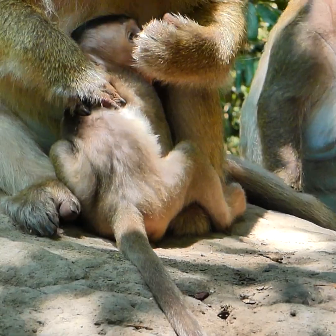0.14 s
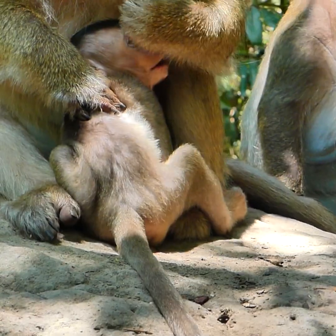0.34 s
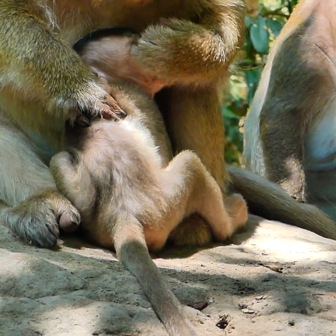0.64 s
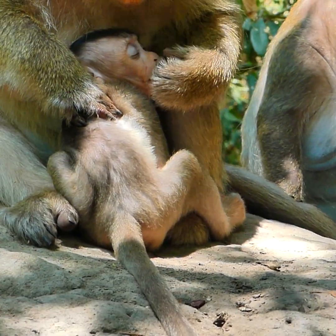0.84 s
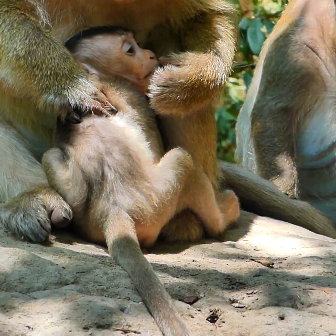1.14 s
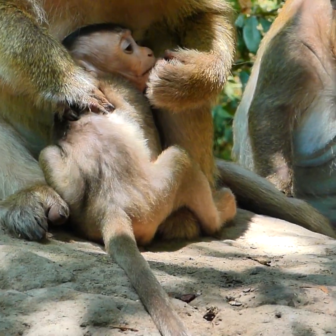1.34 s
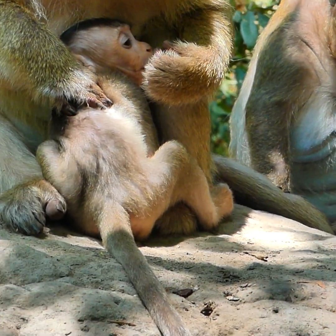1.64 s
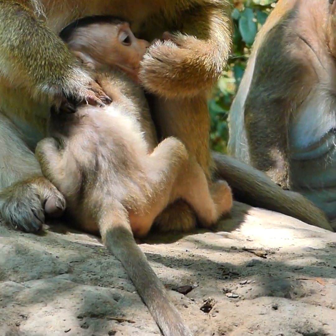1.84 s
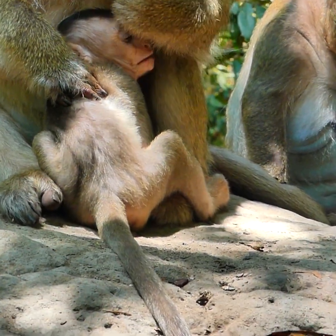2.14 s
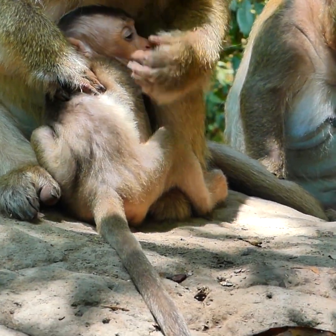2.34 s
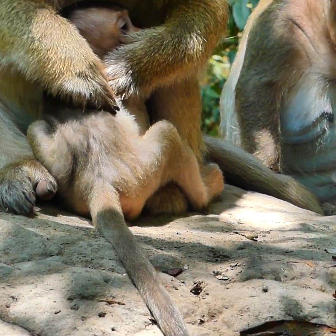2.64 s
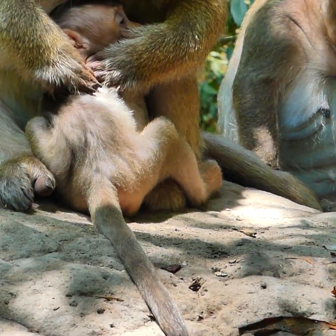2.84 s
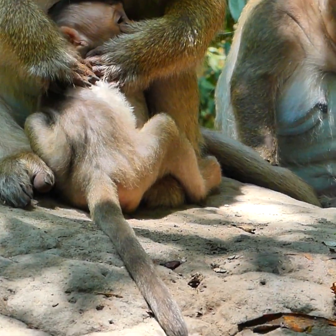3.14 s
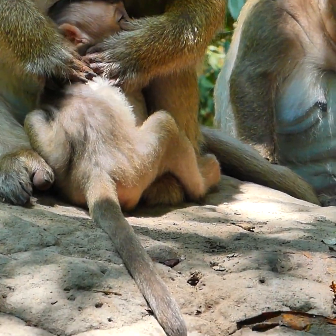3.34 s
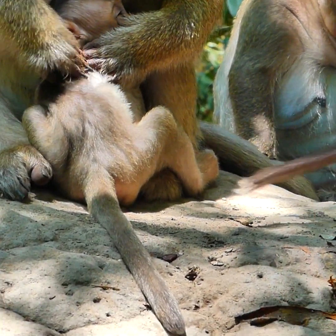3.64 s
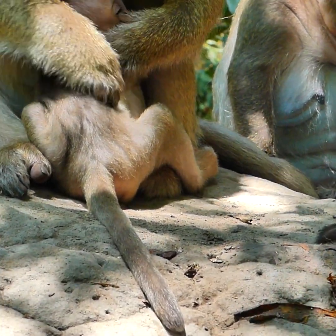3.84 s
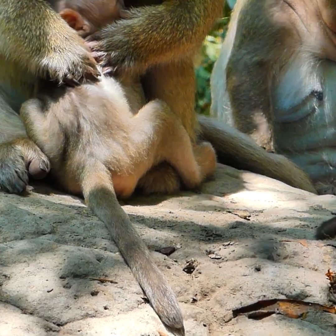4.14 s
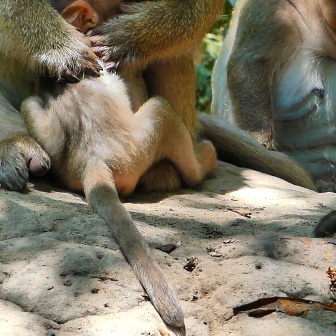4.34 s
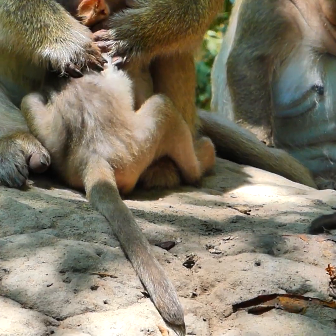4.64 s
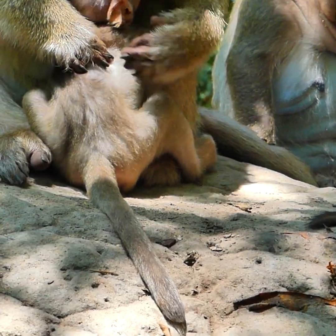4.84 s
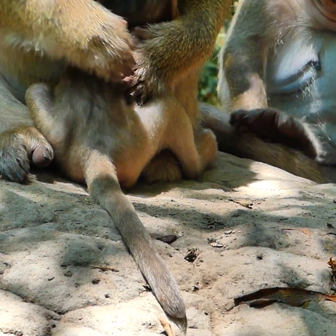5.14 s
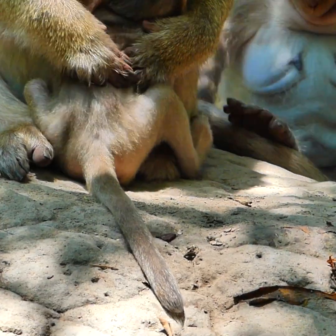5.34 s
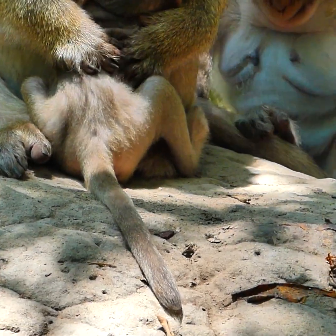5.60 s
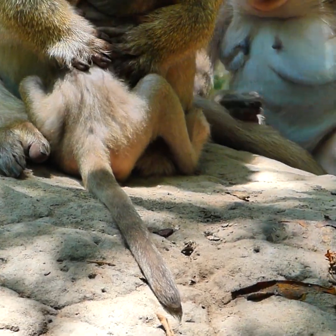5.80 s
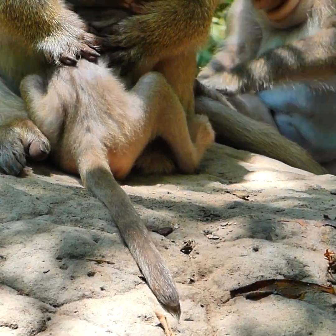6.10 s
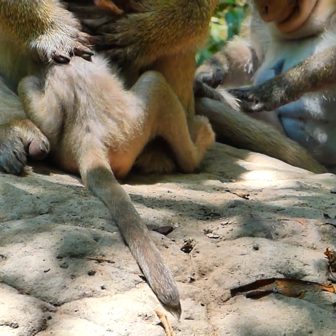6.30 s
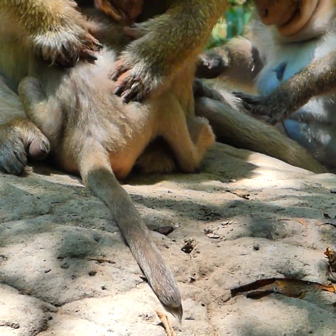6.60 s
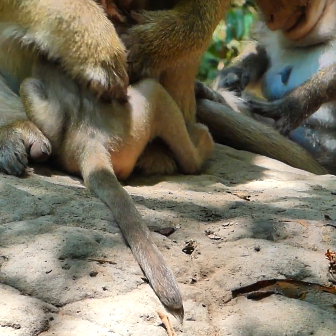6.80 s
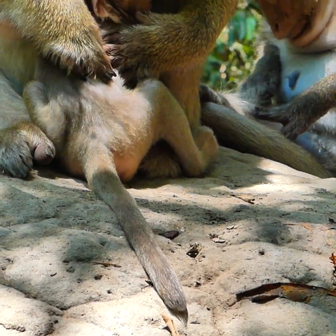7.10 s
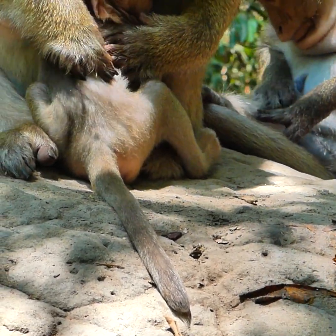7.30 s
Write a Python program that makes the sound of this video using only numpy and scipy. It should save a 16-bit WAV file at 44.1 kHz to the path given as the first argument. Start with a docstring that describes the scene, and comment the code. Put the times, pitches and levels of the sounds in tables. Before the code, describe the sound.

Pulsing cicadas and a chipping bird surround a baby monkey's soft squeaks, hoots and brief rasp, ending in a twig snap, leaf scuffle and piercing cries.

```python
"""Low forest rumble, far insect drones and two swelling, throbbing cicadas lie under a young monkey's
whimpers: near-sine cries with weak partials, soft hoots, and a noise-driven rasp from 0.6 s.
Crackling noise makes the rustles of fur and dry leaves; a bird repeats a quick four-stroke chip in pairs.
The cicadas break off near 5 s; at 6.5 s a twig snaps, leaves scuffle, and the last cries turn shrill.
Rustles, rasp, scuffle and snap reach the right ear later than the left."""
import sys
import numpy as np
from scipy import signal
from scipy.fft import rfft, irfft, next_fast_len
from scipy.io import wavfile
from scipy.ndimage import uniform_filter1d, map_coordinates

SR = 44100
rng = np.random.default_rng(int(sys.argv[2]) if len(sys.argv) > 2 else 0)


def gain_from_db(level_db):
    """Convert decibel levels to linear amplitude factors (20 dB per decade)."""
    decades = np.asarray(level_db, float) / 20
    return 10 ** decades


def transcribe(signal):
    """Save signal, clipped to [-1, 1], as a 16-bit WAV file at the path in sys.argv[1]."""
    frames = np.atleast_2d(signal).T
    limited = np.clip(frames, -1, 1)
    pcm = np.round(limited * 32767).astype(np.int16)
    wavfile.write(sys.argv[1], SR, pcm)


N = 328986


def evened(x):
    """Scales to rms 1."""
    return x / np.sqrt(np.mean(x ** 2) + 1e-20)


def smooth_noise(size, span):
    """White noise averaged over span samples; its rms sinks as span grows."""
    return uniform_filter1d(rng.standard_normal(size), span)


def flicker(size, depth_db, span):
    """A random gain of rms depth_db that wanders over about span samples."""
    return gain_from_db(depth_db * evened(uniform_filter1d(smooth_noise(size, span), span)))


def read(points, hz):
    """Reads a spectrum table on a log-frequency axis."""
    f, value = np.transpose(points)
    return np.interp(np.log(hz + 1), np.log(f + 1), value)


def add(mix, s, sound):
    """Mixes a two-ear sound in at time s."""
    part = mix[:, round(s * SR):][:, :sound.shape[1]]
    part += sound[:, :part.shape[1]]


def resonate(x, hz, width_hz):
    """Two passes of a resonance of gain 1 that follows the curve hz."""
    turn = np.exp(2j * np.pi * np.cumsum(hz * np.ones(x.shape[-1])) / SR)
    r = np.exp(-np.pi * width_hz / SR)
    low = signal.lfilter([(1 - r) ** 2], [1, -2 * r, r * r], x / turn)
    return 2 * (turn * low).real


def coloured(x, shape_db):
    """Filters x by a dB function of frequency."""
    size = next_fast_len(x.shape[-1])
    gain = gain_from_db(shape_db(np.fft.rfftfreq(size, 1 / SR)))
    return irfft(rfft(x, size) * gain, size)[..., :x.shape[-1]]


def two_ears(x, lag_ms, other, same):
    """The right ear hears x late, mixed with a share of unrelated sound."""
    late = map_coordinates(x, [np.arange(len(x)) - lag_ms * SR / 1000], order=3)
    return np.array([x, same * late + np.sqrt(1 - same ** 2) * other])


def crackle(size, grain_db=-1.0, per_s=2500, hiss=0.57):
    """Two unrelated streams of sparse clicks of uneven size in hiss."""
    gauss = rng.standard_normal((2, size))
    struck = rng.random((2, size)) < per_s / SR
    grain = gain_from_db(grain_db * np.minimum(rng.exponential(1, (2, size)), 4))
    return hiss * gauss + evened(gauss * struck * grain)


def echoes(x, t60_s, level_db):
    """Adds the scattered return from trunks and rock, other taps for each ear."""
    t = np.arange(round(.3 * SR)) / SR
    taps = rng.standard_normal((2, len(t))) * (rng.random((2, len(t))) < .05)
    tail = taps * gain_from_db(-60 * t / t60_s) * (t > .004)
    return x + gain_from_db(level_db) * signal.fftconvolve(x, tail / np.linalg.norm(tail[0]), axes=1)[:, :N]


def air():
    """Low rumble and leaf hiss as random short-time spectra with faint patches."""
    # spectrum shape: f/Hz, density/dB
    shape = [(15, -74), (25, -42.5), (123, -0.5), (149, 0), (242, -3), (1610, -22.5), (1790, -22),
             (4140, -28), (5730, -27.5), (6560, -25), (11000, -26), (16000, -37.5)]
    # stereo image: f/Hz, left-right likeness, left minus right/dB
    ears = [(40, 0.049, 7), (90, -0.21, -16), (223, -0.61, -3), (290, -0.79, -1.6), (804, -0.61, -2),
            (2140, -0.3, -0.5), (3600, 0.097, -1), (13000, 0.39, 0.5)]
    level_db, patch_db = -56, 1.98
    frames, hz = N // 512 + 5, np.fft.rfftfreq(2048, 1 / SR)
    a, b, c, d, patches = rng.standard_normal((frames, 1025, 5)).T
    patches = evened(uniform_filter1d(uniform_filter1d(patches, 24, 0), 8, 1))
    f, likeness, tilt_db = np.transpose(ears)
    same = np.clip(read(np.c_[f, likeness], hz), -1, 1)[:, None]
    left = a + 1j * b
    right = same * left + np.sqrt(1 - same ** 2) * (c + 1j * d)
    ear_db = np.multiply.outer([.5, -.5], read(np.c_[f, tilt_db], hz))[..., None]
    z = np.array([left, right]) * gain_from_db(read(shape, hz)[:, None] + patch_db * patches + ear_db)
    return gain_from_db(level_db) * evened(signal.istft(z, nperseg=2048, noverlap=1536)[1][:, :N])


def drones():
    """Many far insects blur into steady bands, almost the same in both ears."""
    # insect choirs: f/Hz, width/Hz, level/dB rms
    choirs = [(5693, 730, -69), (8600, 1060, -73), (10710, 780, -75.5)]
    noise = rng.standard_normal(N) + 0.36 * rng.standard_normal((2, N))
    return sum(gain_from_db(db) * evened(resonate(noise, hz, width_hz)) for hz, width_hz, db in choirs)


def cicada(hz, start_db, full_db, swell_s, stop_s, throbs, width_hz):
    """Tymbal clicks at a nearly even rate ring one resonance; the abdomen pumps level and pitch."""
    click_hz, break_s, warm_s = 122, 0.13, 1.1
    throb_db, cold_sag, throb_bend = 9, .04, .008  # sag and bend as shares of pitch
    t = np.arange(N) / SR
    pump = 2 * np.pi * np.interp(t, *np.transpose(throbs))
    swell_db = full_db + (start_db - full_db) * np.exp(-t / swell_s)
    level = gain_from_db(swell_db) * np.clip(1 - (t - stop_s) / break_s, 0, 1) ** 2
    beats = np.cumsum(click_hz * (1 + 1.2 * smooth_noise(N, 2000))) / SR
    buzz = rng.standard_normal(N) * (.25 + np.exp(-(beats % 1) / .45))
    slack_db = throb_db * (.5 - .5 * np.cos(pump)) ** 1.4
    pitch_hz = hz * (1 - cold_sag * np.exp(-t / warm_s) + throb_bend * np.sin(pump))
    song = evened(resonate(buzz, pitch_hz, width_hz)) * level * gain_from_db(-slack_db)
    return np.array([song, song * gain_from_db(1.3)])


def cicadas():
    """Two cicadas swell ever more slowly, then break off; trunks scatter their song."""
    # each cicada: tymbal f/Hz, start level/dB, full level/dB before throbs, swell time constant/s, stop t/s
    singers = [(8734, -75, -57.5, 1.2, 4.88), (9220, -81, -57.5, 2.7, 5.1)]
    # each cicada's pumping: t/s, throbs counted so far
    throbs = [
        [(0, .1), (.85, 6.98), (2.85, 22.8), (3.65, 29.05), (4.05, 32.11), (5.3, 41.25)],
        [(0, -.6), (2.85, 22.72), (4.1, 32.95), (4.62, 37), (5.03, 40), (5.3, 42.2)],
    ]
    # ring width of each tymbal/Hz
    widths_hz = [480, 320]
    pair = sum(cicada(*c, count, width_hz) for c, count, width_hz in zip(singers, throbs, widths_hz))
    return echoes(pair, .2, -11)


def bird():
    """Each chip is four quick whistled strokes with a faint octave, varied a little each time."""
    # chips: t/s, relative level/dB
    chips = [(0.367, -57.5), (0.544, -55), (1.4149, -56), (1.6296, -55), (2.6204, -56), (2.8193, -53),
             (3.494, -53.5), (3.6958, -53), (4.3926, -52), (4.5861, -53.5), (5.246, -52), (5.4486, -52),
             (6.2498, -51), (6.4675, -47.5), (7.2374, -53.5), (7.439, -52)]
    # four strokes of a chip, each: t/ms, f/Hz before variation, level re chip/dB
    strokes = [
        [(0, 4440, -10.5), (1.5, 7480, 2.5), (3, 7880, -14), (5, 7750, 1.5)],
        [(5.6, 4460, 0.5), (6.8, 7400, -2.5), (8.5, 6940, -4), (10.8, 7100, -5)],
        [(11.4, 5370, 4.5), (12.5, 7360, 7), (14, 6300, -9), (16, 5750, 2)],
        [(16.24, 5380, 13), (17.3, 7250, 4), (21.5, 7500, -8), (22.33, 8100, 23)],
    ]
    gain_db, vary_db, vary_pitch, octave_db = 11.5, 1.3, .015, -22.5
    out = np.zeros((2, N))
    for (s, db), luck in zip(chips, rng.standard_normal((len(chips), 8))):
        for rows, pitch, level in zip(strokes, luck[:4], luck[4:]):
            ms, hz, stroke_db = np.transpose(rows)
            t_ms = np.arange(ms[0], ms[-1], 1000 / SR)
            turns = 2 * np.pi * np.cumsum(np.interp(t_ms, ms, hz)) * (1 + vary_pitch * pitch) / SR
            note = np.sin(turns) + gain_from_db(octave_db) * np.sin(2 * turns)
            note = note * signal.windows.tukey(len(t_ms), .3)
            note = note * gain_from_db(db + gain_db + vary_db * level + np.interp(t_ms, ms, stroke_db))
            add(out, s + ms[0] / 1000, np.tile(note, (2, 1)))
    return echoes(out, 0.22, -3.5)


def rustle(s, db, t60_s, hz, width_octaves):
    """Crackle in one broad band, with its own lumpy colour, that swells and dies."""
    rise_s, lag_ms, lump_db, lump_hz = 0.0041, 2.7, 3, 293
    t = np.arange(round(.5 * SR)) / SR
    lumps_db = lump_db * rng.standard_normal(200)

    def shape_db(f):
        band_db = -12 * (np.log2((f + 1) / hz) / width_octaves) ** 2
        return band_db + np.interp(f / lump_hz, np.arange(len(lumps_db)), lumps_db)

    band = evened(coloured(crackle(len(t)), shape_db))
    band = band * np.minimum(t / rise_s, 1) * gain_from_db(db - 60 * np.maximum(t - rise_s, 0) / t60_s)
    return s, two_ears(band[0], lag_ms, band[1], same=0.5)


def scuffle():
    """Dense leaf crackle under a moving body; each kick swells and sinks at one pace."""
    # steady shuffle: from t/s, to t/s, level/dB
    start, end, db = (6.488, 7.2, -58)
    # kicks: t of the top/s, level/dB
    kicks = [(6.49, -49), (6.55, -53.5), (6.66, -60), (6.749, -45.5), (6.83, -54), (6.88, -52),
             (6.936, -44.5), (7.0, -52), (7.109, -44.5), (7.127, -39)]
    # leaf colour: f/Hz, level/dB
    leaf_colour = [(1000, -19.5), (2120, -10.5), (3360, -6), (3830, -0.5), (5640, -6.5), (7500, -0.5),
                   (9110, -4.5), (11800, -11)]
    fade_s, kick_db_per_s, flicker_db = 0.11, 330, 2
    t = np.arange(start, end + fade_s, 1 / SR)
    shuffle = gain_from_db(db) * np.clip(1 - (t - end) / fade_s, 0, 1) ** 2
    level = shuffle + sum(gain_from_db(d - kick_db_per_s * abs(t - s)) for s, d in kicks)
    leaves = crackle(len(t), grain_db=0.0, per_s=2900, hiss=0.82)
    leaves = evened(coloured(leaves, lambda f: read(leaf_colour, f) - 30 * (f > 11900)))
    level = level * flicker(len(t), flicker_db, span=300)
    return start, level * two_ears(leaves[0], 1.295, leaves[1], same=0.23)


def snap():
    """A twig breaks with a very brief dry ring, then its ends knock once more."""
    # break: t/s, peak level/dB, right ear lag/ms
    s, db, lag_ms = (6.4888, -21, .748)
    # wood modes: f/Hz, level/dB
    modes = [(4050, 0), (6700, -2), (8020, -2), (9400, -8), (12000, -12)]
    rise_s, t60_s, knock_s = .0012, .012, .0058
    t = np.arange(round(.03 * SR)) / SR
    ring = sum(gain_from_db(d) * np.sin(2 * np.pi * f * t) for f, d in modes)
    ring = ring * np.minimum(t / rise_s, 1) * gain_from_db(-60 * t / t60_s)
    ring = ring + .5 * np.interp(t - knock_s, t, ring, left=0)
    return s, gain_from_db(db) * two_ears(ring / abs(ring).max(), lag_ms, 0, same=1)


def hoot(s, hz, db, length_s):
    """A brief hollow tone with a quick start and a wavering pitch."""
    t = np.arange(0, 2 * length_s, 1 / SR)
    turns = np.cumsum(hz * (1 + 0.75 * smooth_noise(len(t), 200))) / SR
    x = 4 * t / length_s
    right_lag_rad = np.array([[0], [.8]])
    return s, gain_from_db(db) * np.sin(2 * np.pi * turns - right_lag_rad) * x * np.exp(1 - x)


def rasp():
    """Irregular fold slaps and breath noise drive a throat; its middle resonances sink as the mouth shuts."""
    # hoarse span: from t/s, to t/s
    start, end = (.64, 1.27)
    # throat resonances: f/Hz, width/Hz, gain/dB
    resonances = [(1230, 280, 2), (1830, 320, -2), (2230, 300, -3), (2790, 240, -12)]
    # surges: t/s, level/dB before throat gain, f that the mouth favours/Hz
    surge_rows = [(0.644, -60.5, 1200), (.74, -63, 2210), (.82, -71, 2300), (.91, -53, 1860),
                  (1.0, -63, 1530), (1.105, -64, 1550)]
    steady_db, rise_s, fade_s, surge_t60_s = -66, 0.016, 0.13, 0.42
    favour_db_per_octave, flicker_db = 13.5, 1
    t = np.arange(start, end, 1 / SR)
    mouth = np.interp(t, [.85, 1.12], [1, .8])
    drive = crackle(len(t), grain_db=-0.5, per_s=300, hiss=0.79)
    throat = 0
    for k, ((f, width_hz, gain_db), m) in enumerate(zip(resonances, [1, mouth, mouth, 1])):
        level = gain_from_db(steady_db)
        for s, db, hz in surge_rows:
            decay_db = 60 * np.maximum(t - s, 0) / surge_t60_s
            off_db = favour_db_per_octave * abs(np.log2(f * m / hz))
            level = level + np.clip((t - s) / rise_s, 0, 1) * gain_from_db(db - decay_db - off_db)
        level = level * flicker(len(t), flicker_db, span=700)
        sign = (-1) ** k
        throat = throat + sign * gain_from_db(gain_db) * evened(resonate(drive, f * m, width_hz)) * level
    throat = throat * np.clip(np.minimum((t - start) / rise_s, (end - t) / fade_s), 0, 1)
    return start, two_ears(throat[0], 1.05, throat[1], same=.6)


def cry(rows, second_db, loss_db, third_db, hoarse):
    """Slightly unsteady folds give a near sine with weak partials and breath; strain adds the shrill top."""
    # voice lead: t/s, lead of the left ear over the right/cycles of the voice
    ear_lead = [(0, -.42), (.04, -.46), (.12, -.93), (.26, -1), (.31, -1.16), (.47, -1.24), (1.46, .07),
                (1.55, -.08), (1.68, -.11), (2.72, -.33), (2.8, -.34), (2.88, .1), (3.1, -.08),
                (3.42, -.08), (4.96, -.14), (5.06, 0), (5.17, 0), (6.54, -0.35), (6.67, -0.43),
                (6.88, -0.17), (6.955, 0.48), (7.01, -0.26), (7.085, -.5), (7.105, -.67), (7.14, -.55),
                (7.39, .22), (7.455, 0.28)]
    # strain on the upper partials: from t/s, to t/s, level/dB before mouth gain
    strain_rows = [(6.865, 6.966, -47), (6.96, 7.075, -52.5), (7.097, 7.137, -50)]
    # mouth resonances: f/Hz, width/Hz, gain/dB
    mouth = [(6720, 1300, 4.8), (8530, 530, 0.84)]
    # voice cracks into noise: t/s, half length/s, level/dB before the closing sqrt(2)
    cracks = [(0.211, 0.022, -53.5), (.25, 0.016, -62), (2.88, 0.11, -67.5), (5.108, 0.07, -62.5)]
    rise_s, fall_s, edge_db = .015, .022, -16
    breath_db, upper_breath_db, breath_width_hz, crack_width_hz = -30, -15, 240, 430

    s, pitch, effort_db = np.transpose(rows)
    t = np.arange(max(s[0] - rise_s, 0), s[-1] + fall_s, 1 / SR)
    size = len(t)
    hz = np.interp(t, s, pitch)

    # the second partial changes as the pitch sinks: a fading one ever faster, a growing one evenly
    edge = np.maximum(np.maximum((s[0] - t) / rise_s, (t - s[-1]) / fall_s), 0)
    first_db = np.interp(t, s, effort_db) + edge_db * edge
    sunk_tenths = 10 - 10 * hz / pitch.max()
    second_db = first_db + second_db - loss_db * sunk_tenths ** (2 if loss_db > 0 else 1)

    turns = np.cumsum(hz * (1 + (0.024 + hoarse) * smooth_noise(size, 200))) / SR
    lead = np.interp(t, *np.transpose(ear_lead))
    turns = 2 * np.pi * (turns + np.multiply.outer([.5, -.5], lead))
    partials_db = [first_db, second_db, second_db + third_db]
    voice = sum(gain_from_db(db) * np.sin(k * turns) for k, db in enumerate(partials_db, 1))
    voice = voice * (1 + .8 * hoarse * evened(smooth_noise(size, 250)))  # hoarse folds beat unevenly

    strain = sum(gain_from_db(db) * np.clip(np.minimum(t - a, b - t) / 0.015, 0, 1) for a, b, db in strain_rows)
    top = 0
    for k in range(4, 10):
        gain = sum(gain_from_db(db) / (1 + (2 * (k * hz - f) / w) ** 4) for f, w, db in mouth)
        top = top + gain * np.sin(k * turns)
    flutter = gain_from_db(20.0 * smooth_noise(size, 150))

    # breath noise hangs round the first two partials
    breath = 0
    for k, db in [(1, first_db + breath_db), (2, second_db + upper_breath_db)]:
        noise = resonate(rng.standard_normal((2, size)), k * hz, k * breath_width_hz)
        breath = breath + gain_from_db(db) * evened(noise)

    # cracks sit round the second or third partial, whichever is nearer 2100 Hz
    burst = sum(gain_from_db(db) * np.clip(1 - abs(t - at) / half, 0, 1) for at, half, db in cracks)
    crack_hz = np.clip(2100 / hz, 2, 3).round() * hz
    crack = burst * evened(resonate(rng.standard_normal((2, size)), crack_hz, crack_width_hz))

    sound = voice + breath + crack + strain * flutter * top
    return t[0], np.sqrt(2) * sound * signal.windows.tukey(size, .04)


def scene():
    """The voice has a faint echo, the rustles a stronger one; bird and cicadas carry their own."""
    # each cry while held: t/s, pitch f/Hz, effort level/dB
    cries = [
        [(0, 988, -47), (0.05, 1001, -46)],
        [(0.08, 1017, -55), (0.12, 1069, -51), (0.195, 1044, -52.5), (0.26, 1026, -44), (0.31, 986, -41),
         (0.435, 935, -37.5), (0.47, 942, -44)],
        [(1.372, 901, -47.5), (1.455, 967, -43), (1.605, 958, -41), (1.675, 929, -38), (1.81, 908, -40),
         (1.845, 907, -46.5)],
        [(2.03, 847, -67), (2.19, 847, -65), (2.33, 812, -78)],
        [(2.725, 852, -51), (2.76, 883, -44.5), (2.8, 846, -54), (2.842, 815, -58), (2.858, 840, -63),
         (2.89, 857, -53)],
        [(2.925, 703, -63), (2.95, 586, -53), (2.995, 486, -62), (3.05, 473, -62.5), (3.135, 528, -63.5)],
        [(3.335, 712, -53), (3.38, 735, -45), (3.42, 739, -45), (3.44, 723, -54), (3.48, 703, -64)],
        [(3.34, 892, -53), (3.352, 928, -51.5)],
        [(4.915, 910, -44.5), (4.95, 933, -36.5), (4.97, 986, -37), (4.99, 1030, -54.5), (5.04, 970, -70)],
        [(5.062, 842, -59.5), (5.092, 760, -60)],
        [(5.105, 710, -54.5), (5.13, 555, -63), (5.165, 481, -72.5)],
        [(6.52, 866, -51), (6.54, 920, -39), (6.555, 943, -37), (6.645, 903, -41.5), (6.655, 977, -37),
         (6.672, 997, -67), (6.715, 960, -52.5)],
        [(6.875, 1116, -35), (6.93, 1099, -34), (6.95, 1127, -42)],
        [(6.965, 1210, -48), (6.985, 1140, -43.5), (7.005, 1083, -36.5), (7.045, 1087, -33.5),
         (7.08, 1065, -32), (7.1, 1035, -33.5), (7.127, 1054, -29.5), (7.15, 1107, -46)],
        [(7.382, 1036, -37), (7.4, 993, -30.5), (7.455, 966, -31)],
    ]
    # each cry: second partial over first at top pitch/dB, its loss when the pitch has sunk by a tenth/dB
    seconds = [(-11.5, -6), (-7, 11), (-18.5, 56), (-32, 0), (-14.5, -12), (-30.5, -9), (-24, 5), (-12, 6),
               (-19.5, 14), (-1, -7), (-14.5, -8), (-27.5, 5), (-16, -3), (-24, 1), (-32, 5)]
    # each cry: third partial over second/dB, hoarseness 0-1
    thirds = [(-30, .07), (-30, .04), (-20, .04), (-3, .3), (-3, .02), (-18, .3), (8, .06), (4, .3),
              (-15, .05), (-6, .22), (-10, .35), (-15, .1), (-18, .07), (-14, .06), (-20, .02)]
    # soft hoots: t/s, f/Hz, peak level/dB, length/s (peak at a quarter of it)
    hoots = [(2.919, 957, -55, 0.03), (3.918, 553, -49, 0.069), (4.005, 528, -57, .045),
             (4.494, 661, -47.5, 0.029), (4.75, 767, -47, 0.016), (5.827, 290, -49, 0.031),
             (6.174, 539, -55.5, 0.055), (6.3, 643, -50, 0.056)]
    # rustles of fur and leaves: t/s, level/dB, t60/s, centre f/Hz, width to -12 dB/octaves
    rustles = [(.13, -52.5, 0.32, 5800, 1.4), (.699, -53.5, 0.14, 5100, 0.69),
               (.859, -57, 0.23, 5050, 0.71), (1.022, -56, 0.28, 4900, 0.71),
               (1.102, -48.5, 0.47, 4900, 0.93), (1.104, -58.5, 0.3, 2360, 0.2),
               (1.268, -57, 0.052, 2800, 1.4), (1.325, -54.5, 1, 252, 2.4), (1.606, -54, 0.27, 8000, 4.5),
               (3.425, -53.5, 0.046, 5640, .46), (3.88, -53, 0.43, 710, 1.15),
               (4.494, -52, 0.56, 2500, 1.5), (4.55, -64, 0.32, 2500, .6), (4.68, -61, 1, 620, 0.56),
               (4.6, -59, 0.077, 860, 0.4), (4.74, -55, 0.3, 840, 1.7), (4.765, -63.5, 0.5, 4120, 0.35),
               (5.03, -65.5, 0.33, 4100, .25), (5.045, -55, 0.38, 8500, 0.64),
               (3.487, -58.5, 0.054, 2520, 0.69), (5.945, -64.5, 0.16, 2500, 0.88),
               (6.415, -57.5, 1, 6000, 0.84), (7.122, -38, 0.051, 4600, 0.92)]
    voice, near = np.zeros((2, 2, N))
    for rows, second, third in zip(cries, seconds, thirds):
        add(voice, *cry(rows, *second, *third))
    near_sounds = [rustle(*r) for r in rustles] + [scuffle(), snap()]
    near_sounds += [hoot(*h) for h in hoots] + [rasp()]
    for s, sound in near_sounds:
        add(near, s, sound)
    voice = echoes(voice, .25, -21)
    near = echoes(near, .15, -10)
    return air() + drones() + cicadas() + bird() + near + voice


def low_pass(x):
    """Removes everything above the highest recorded frequency."""
    return signal.sosfilt(signal.butter(12, 16470, fs=SR, output="sos"), x)


def record(dry):
    """Delivers the finished mix."""
    return low_pass(dry)


dry = scene()
out = record(dry)
transcribe(out)
```